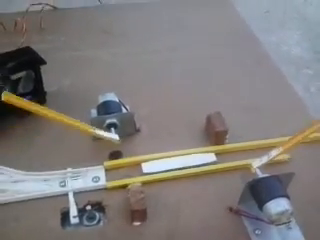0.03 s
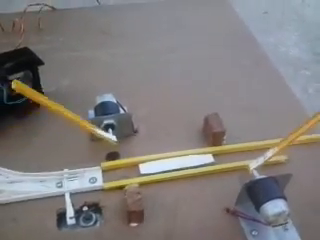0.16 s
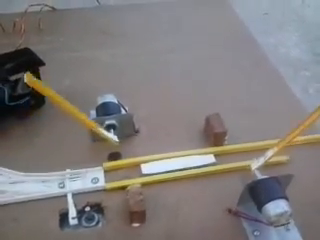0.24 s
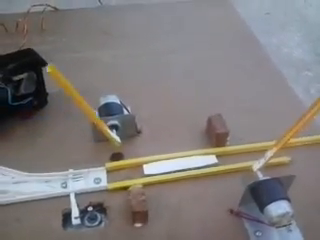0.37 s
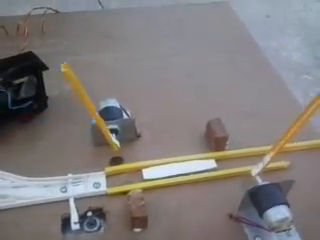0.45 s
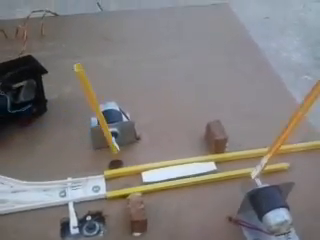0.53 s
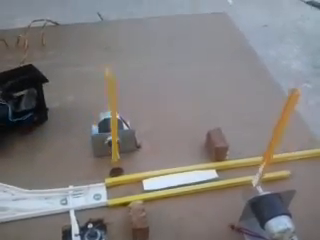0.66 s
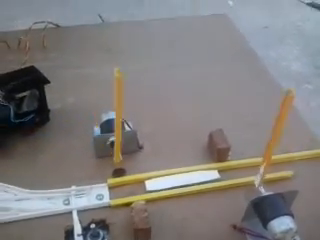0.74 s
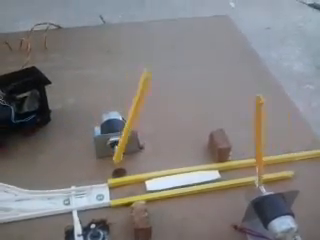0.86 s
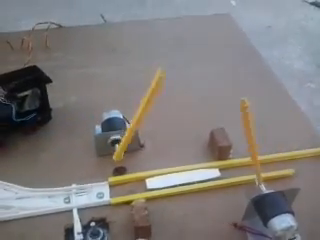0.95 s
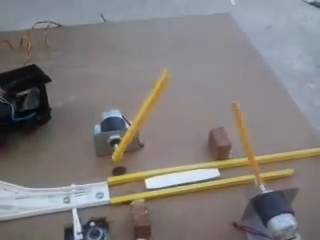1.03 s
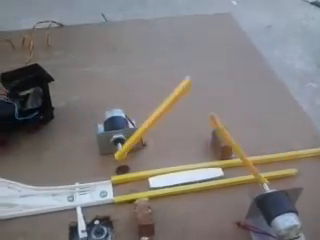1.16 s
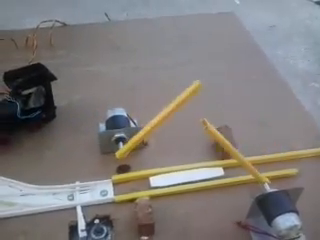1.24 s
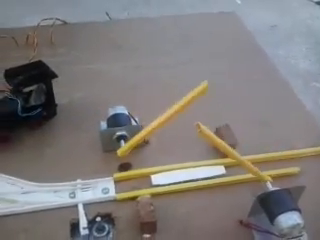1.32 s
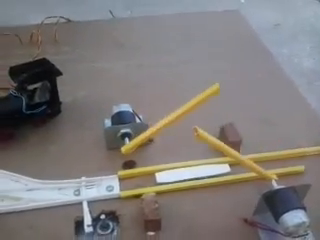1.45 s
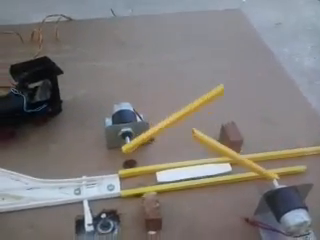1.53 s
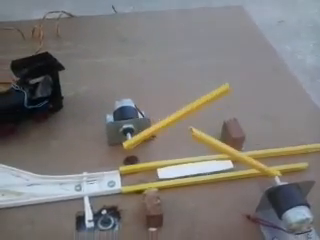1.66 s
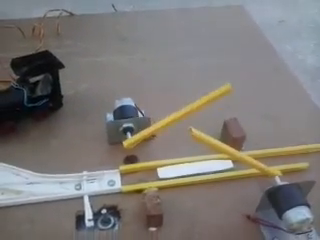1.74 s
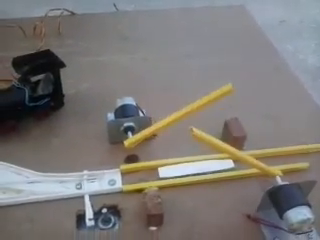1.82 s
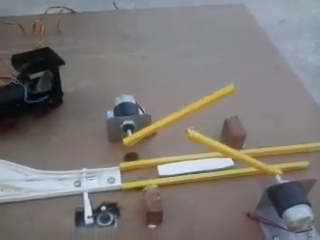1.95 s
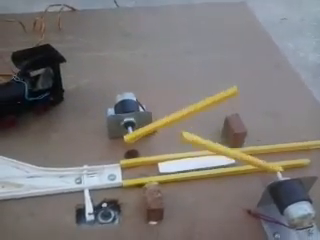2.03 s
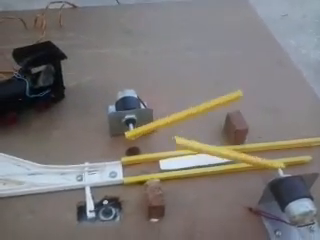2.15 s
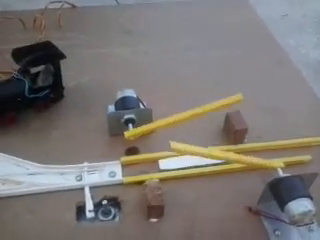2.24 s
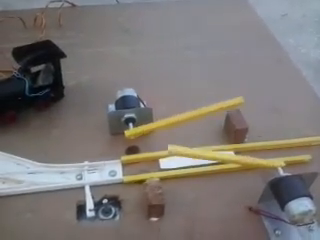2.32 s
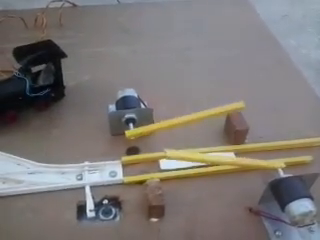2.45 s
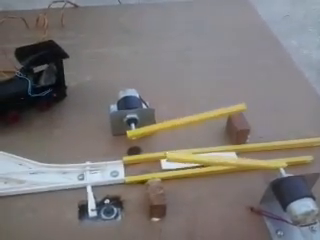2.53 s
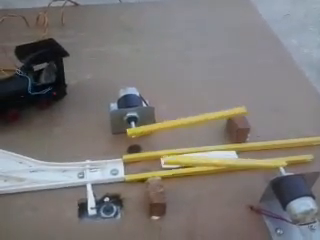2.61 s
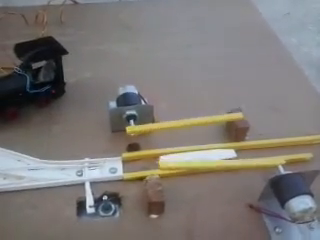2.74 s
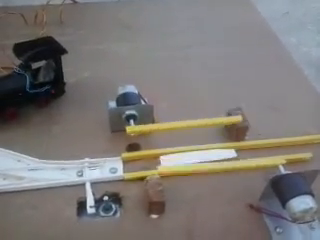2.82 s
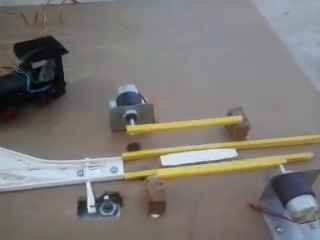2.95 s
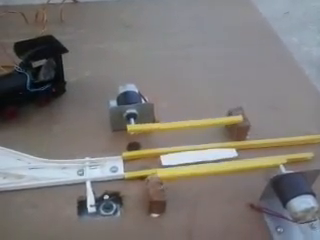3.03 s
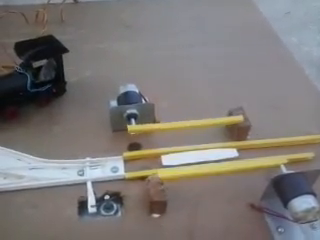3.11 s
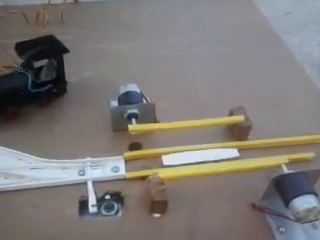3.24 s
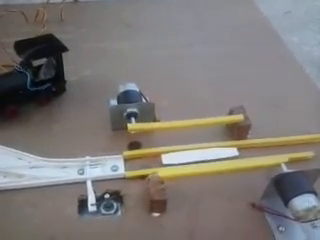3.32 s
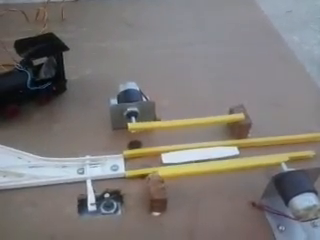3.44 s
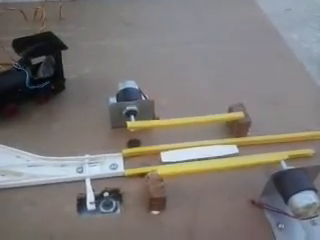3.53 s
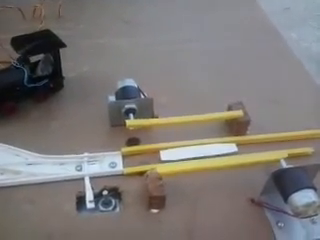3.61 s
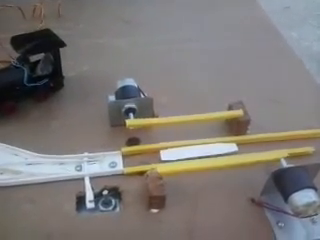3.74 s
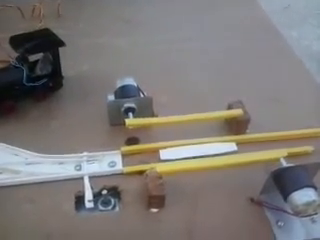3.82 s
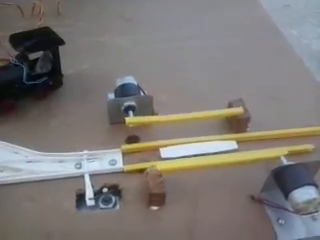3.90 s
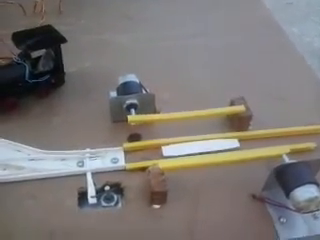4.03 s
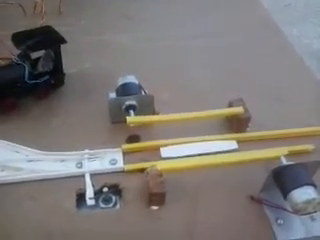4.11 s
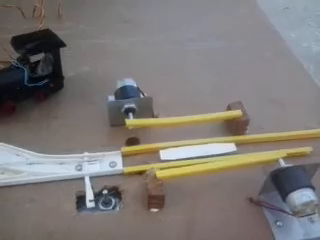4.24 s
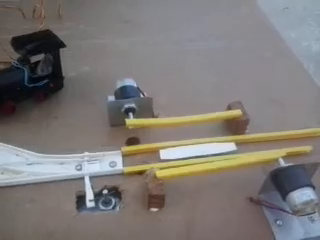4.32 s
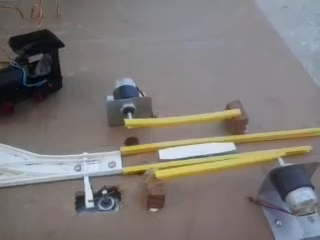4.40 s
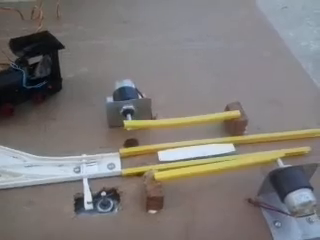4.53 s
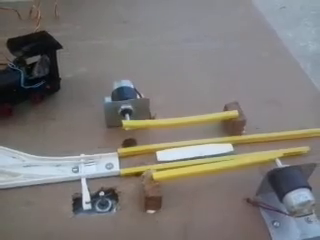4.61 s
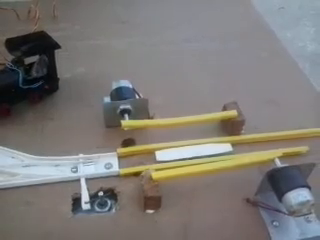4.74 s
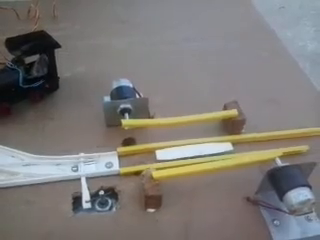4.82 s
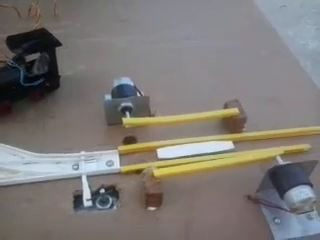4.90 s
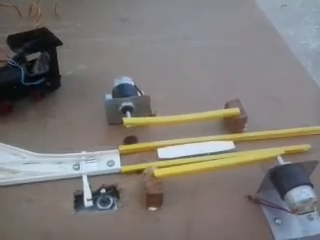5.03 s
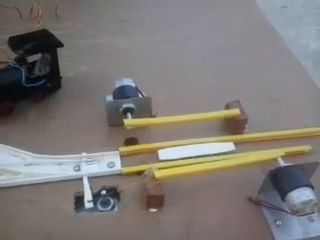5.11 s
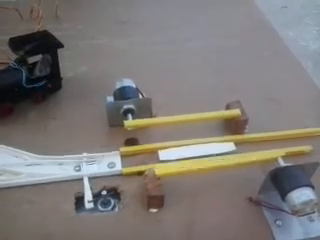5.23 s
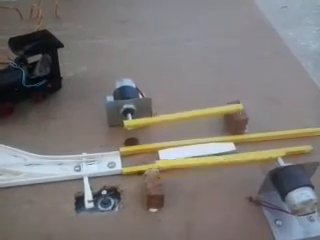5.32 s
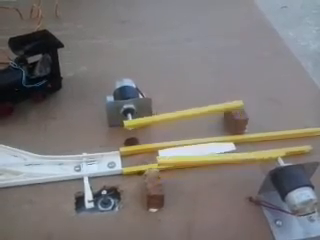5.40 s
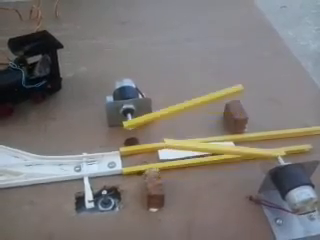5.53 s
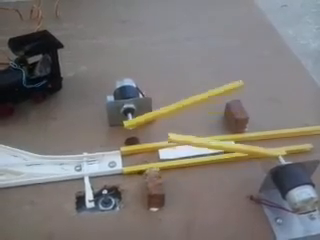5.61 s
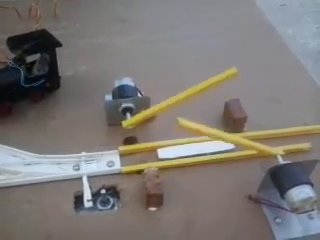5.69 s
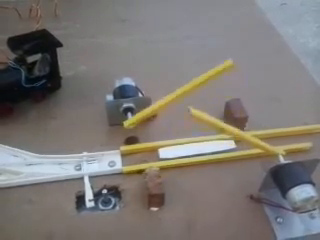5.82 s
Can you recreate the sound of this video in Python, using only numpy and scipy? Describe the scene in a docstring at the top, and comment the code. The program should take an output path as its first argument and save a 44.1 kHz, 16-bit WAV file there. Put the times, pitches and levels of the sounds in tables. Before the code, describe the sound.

Two tiny electric gear motors move barrier arms: gritty, metallic gear chatter with a fast flutter, falling in pitch as power cuts. Loose gears knock hard, brackets rattle, thin squeals fill pauses. Four bursts begin with a bright click. The near motor dominates until a final burst from the other. Quiet room noise behind; close, mono, limited treble.

```python
"""Two small gear motors swing barrier arms on a model railway board, indoors, in stop-start bursts of power.
Meshing teeth strike, scrape and chatter at the tooth rate; the rasp throbs once a wheel turn, then coasts down.
Resonant gearboxes, rattling brackets, a singing plate and a humming board radiate this force.
The near gearbox dominates at first, the far one in the last burst; switch snaps start four of the bursts.
Slack gears knock, thin squeals fill pauses, and steady room noise with faint low tones lies behind."""
import sys
import numpy as np
from scipy import signal
from scipy.fft import rfft, irfft, next_fast_len
from scipy.io import wavfile
from scipy.ndimage import uniform_filter1d, map_coordinates

SR = 44100
rng = np.random.default_rng(int(sys.argv[2]) if len(sys.argv) > 2 else 0)


def wav_out(sig):
    """Save sig, one row per channel (or a flat mono array), as 16-bit PCM at SR to the path in sys.argv[1]."""
    wavfile.write(sys.argv[1], SR, np.round(np.clip(np.atleast_2d(sig).T, -1, 1) * 32767).astype(np.int16))


N = 258426

# resonances of the near gearbox: centre_hz, width_hz, gain_db
NEAR_BOX_MODES = [(2468, 220, -11), (2970, 187, -4.5), (4050, 150, -12), (4660, 130, 0.5),
                  (5046, 155, -0.5), (5410, 216, -0.5), (5866, 220, -4.5), (6840, 437, -1.5)]
# near gear, teeth meeting per second: at the outset, and the limit under power
START_SPEED, FULL_SPEED = 886, 1000
CREEP_SPEED = 139  # teeth per second; well below it the gears barely sound


def amp(db):
    """Level to gain: twenty decibels are a factor of ten in amplitude."""
    return 10 ** (np.asarray(db) / 20)


def unit(x):
    """Normalisation: scale to an rms of 1."""
    return x / np.sqrt(np.mean(x ** 2) + 1e-20)


def curves(rows):
    """Linear interpolation in time: one value per sample for each column after the first."""
    times_s, *columns = np.transpose(rows)
    t = np.arange(N) / SR
    return [np.interp(t, times_s, column) for column in columns]


def filtered(x, response):
    """Convolution theorem: filtering multiplies the spectrum by a complex response of frequency."""
    size = 2 * next_fast_len(N // 2 + SR // 4)
    hz = np.fft.rfftfreq(size, 1 / SR)
    return irfft(rfft(x, size) * response(hz), size)[:N]


def coloured(x, points):
    """Minimum-phase filter: folding the cepstrum makes a causal response through (Hz, dB) points."""
    def response(hz):
        point_hz, point_db = np.transpose(points)
        gain_db = np.interp(np.log(hz + 1), np.log(point_hz), point_db)
        cepstrum = irfft(np.log(amp(gain_db)))
        half = len(cepstrum) // 2
        folded = np.r_[cepstrum[0], 2 * cepstrum[1:half]]
        return np.exp(rfft(folded, len(cepstrum)))
    return filtered(x, response)


def ringing(x, modes):
    """Modal superposition: a sum of damped resonances of alternating sign, each (Hz, width Hz, dB)."""
    def response(hz):
        total = 0
        for k, (centre, width, db) in enumerate(modes):
            damping = 1j * hz * width
            total = total + (-1) ** k * amp(db) * damping / (centre * centre - hz * hz + damping)
        return total
    return filtered(x, response)


def radiated(force, body):
    """Radiation through a body, scaled so that the power of white noise passes unchanged."""
    impulse = np.r_[1., np.zeros(N - 1)]
    return body(force) / np.linalg.norm(body(impulse))


def burst(decay):
    """Impact noise: a 40 ms scrap of energy 1 that dies exponentially, decay in seconds."""
    t = np.arange(SR // 25) / SR
    x = rng.standard_normal(len(t)) * np.exp(-t / decay)
    return x / np.linalg.norm(x)


def wobble(rate):
    """Band-limited randomness: a smooth curve through rate random knots a second; rate may vary."""
    place = np.cumsum(np.abs(rate) * np.ones(N)) / SR
    return map_coordinates(rng.standard_normal(N // 4), [place], mode="wrap")


def fuzzy(hz, width):
    """Narrow-band noise: random modulation, width knots a second, of a carrier in quadrature."""
    phase = 2 * np.pi * np.cumsum(hz * np.ones(N)) / SR
    return wobble(width) * np.cos(phase) + wobble(width) * np.sin(phase)


def swell(start, end, fade):
    """Linear envelope: fade in, hold, fade out, all in seconds."""
    t = np.arange(N) / SR
    return np.clip(np.minimum(t - start, end - t) / fade, 0, 1)


def room():
    """Stationary coloured noise: the steady sound of a quiet room."""
    # room spectrum, relative: frequency_hz, density_db
    spectrum = [(25, -14.5), (45, -18.5), (75, -25), (105, -36.5), (135, -21.5), (200, -17), (280, -13),
                (430, -8.5), (600, -11.5), (900, -11), (1350, -14.5), (1700, -16), (3500, -25.5),
                (5700, -26), (7400, -36), (9600, -84.5)]
    return amp(-48.5) * unit(coloured(rng.standard_normal(N), spectrum))


def low_tones():
    """Narrow-band noise: faint low tones that waver by random modulation."""
    # start_s, end_s, pitch_hz, level_db
    tones = [(3.8, 4.204, 546, -52), (5.329, 5.946, 465, -51), (5.452, 5.894, 830, -50.5)]
    sound = np.zeros(N)
    for start, end, hz, db in tones:
        sound = sound + amp(db) * swell(start, end, fade=.08) * fuzzy(hz, width=37)
    return sound


def squeals():
    """Gliding narrow-band noise: thin airy squeals, mostly between bursts."""
    # start_s, end_s, first_hz, last_hz, width (random knots per s), first_db, last_db
    glides = [(1.823, 1.972, 4750, 5250, 228.8, -42, -45), (4.472, 4.868, 5850, 5110, 850, -49, -57),
              (4.859, 5.13, 4890, 4670, 1498, -54.5, -50)]
    sound = np.zeros(N)
    for start, end, first_hz, last_hz, width, first_db, last_db in glides:
        hz, db = curves([(start, first_hz, first_db), (end, last_hz, last_db)])
        tone = 0.53 * fuzzy(hz, width) + 0.87 * fuzzy(hz, 0.91 * width)
        level = amp(db + 2.9 * wobble(30))
        sound = sound + level * swell(start, end, fade=0.039) * tone
    return sound


def background():
    """Superposition of the room noise, the low tones and the squeals."""
    return room() + low_tones() + squeals()


def snaps():
    """Impact and rebound: the switch contact strikes and bounces once."""
    # strike_s, level_db (before a common gain), bounce_delay_s, bounce_db (relative to the strike)
    strikes = [(1.942, -1, 0.0024, -6), (2.5905, -0.5, .0016, -8), (4.1759, -0.5, .0024, -7.5),
               (5.0971, -2.5, 0.0035, -3)]
    # relative spectrum of the switch: frequency_hz, gain_db
    switch_spectrum = [(100, -29.5), (300, -29), (1000, -27.5), (1600, -19.5), (2400, -22), (3200, -31),
                       (4200, -15), (4800, -2.5), (5600, -1.5), (6300, 2), (7000, -16), (8000, -22.5)]
    force = np.zeros(N + SR)
    for s, db, delay, bounce_db in strikes:
        for when, level_db in ((s, db), (s + delay, db + bounce_db)):
            hit = burst(decay=0.0009)
            force[round(when * SR):][:len(hit)] += amp(level_db + 12) * hit
    return radiated(force[:N], lambda x: coloured(x, switch_spectrum))


def knocks():
    """Impact excitation: slack wheels jump and knock in the near gearbox; harder ones chatter longer."""
    # knock_s, level_db (before a common gain)
    blows = [(0.286, -0.5), (0.4304, -1), (0.4604, 1), (0.8544, -13), (0.9109, 3), (1.891, -26.5),
             (2.2911, 0.5), (2.855, -2.5), (2.908, 1), (3.2385, -37), (3.2914, -33), (3.3485, -31),
             (4.567, -34), (4.743, -35.5), (5.1414, -25), (5.1703, -24), (5.213, -9.5)]
    tilt = [(800, -18), (2500, -5.5), (4500, 3.0)]  # Hz, dB
    force = np.zeros(N + SR)
    for s, db in blows:
        hit = burst(decay=np.interp(db, [-30, -5], [.0013, .006]))
        force[round(s * SR):][:len(hit)] += amp(db + 10.5) * hit
    return radiated(force[:N], lambda x: coloured(ringing(x, NEAR_BOX_MODES), tilt))


def drive():
    """Motor kinematics, in teeth per second: exponential approach to full speed, then even slowing."""
    # on_s, off_s, spin_up_s (time constant), slowing (teeth per second each second, once off)
    power_bursts = [(0, 1.088, 1.758, 1181), (1.942, 2.164, .207, 1096), (2.5906, 2.801, .246, 1490),
                    (4.1755, 4.322, .224, 2656), (5.0965, 5.131, .22, 30), (5.27, 5.56, .17, 300)]
    t = np.arange(N) / SR
    speed = np.full(N, float(START_SPEED))
    for on, off, spin_up, slowing in power_bursts:
        first = round(on * SR)
        powered = np.minimum(t[first:], off) - on
        coasting = np.maximum(t[first:] - off, 0)
        reached = FULL_SPEED + (speed[first] - FULL_SPEED) * np.exp(-powered / spin_up)
        speed[first:] = np.maximum(reached - slowing * coasting, 0)
    return speed


def loudness(speed):
    """Power law: faster teeth strike harder, and the gain dies away at a creep."""
    # about -16 dB at full speed, 11 dB more per tenfold speed
    power_law = amp(-16 + 11 * np.log10(speed / FULL_SPEED + 1e-6))
    return power_law * speed ** 2 / np.hypot(speed ** 2, CREEP_SPEED ** 2)


def throb(speed, depth_db, uneven_db):
    """Amplitude modulation: an off-centre wheel bears down once a turn, never quite alike."""
    turn_rate = speed / 26  # 26 teeth a turn
    turns = np.cumsum(turn_rate) / SR
    return unit(amp(depth_db * np.cos(2 * np.pi * turns) + uneven_db * wobble(turn_rate)))


def teeth(speed, scatter_db, scrape, chatter, decay, slack):
    """Mesh excitation of even power: each tooth strikes, then scrapes and chatters; decay, slack in s."""
    phase = np.cumsum(speed) / SR
    meet = np.flatnonzero(np.diff(np.floor(phase)))
    chance = rng.standard_normal((len(meet), 2))
    # slack shifts each blow in time, scatter varies its strength
    shift = np.round(slack * SR * chance[:, 0]).astype(int)
    at = np.clip(meet + shift, 0, N - 1)
    blows = np.bincount(at, amp(scatter_db * chance[:, 1]), N)
    # the scrape dies after each blow, the chatter follows the smoothed power
    keep = np.exp(-2 / (decay * SR))
    tails = np.sqrt(signal.lfilter([1 - keep], [1, -keep], blows ** 2))
    smoothed = uniform_filter1d(blows ** 2, SR // 25)
    power = np.abs(uniform_filter1d(smoothed, SR // 25))
    noise_level = scrape * tails + chatter * np.sqrt(power)
    force = blows + noise_level * rng.standard_normal(N)
    return force / np.sqrt(power * (1 + (scrape + chatter) ** 2) + 1e-4)


def gearboxes(near, far):
    """Forced resonance: each gear train rings its own box, and small boxes radiate little bass."""
    # resonances of the far gearbox: centre_hz, width_hz, gain_db
    far_box_modes = [(2277, 230, -12), (2870, 143, -5), (3475, 470, -10.5), (3980, 160, -8.5),
                     (4587, 237, -1.5), (5166, 320, -1.5), (5440, 277, 1.5), (6390, 1220, -8.5)]
    near_sound = amp(-0.5) * radiated(near, lambda x: ringing(x, NEAR_BOX_MODES))
    far_sound = amp(2.0) * radiated(far, lambda x: ringing(x, far_box_modes))
    return coloured(near_sound + far_sound, [(500, -12.5), (1200, 1.5), (2300, 0)])


def brackets(force, rattle_db, speed):
    """Structure-borne sound: the gear force rattles the brackets, relatively more at a creep."""
    # relative spectrum of the brackets: frequency_hz, gain_db
    bracket_spectrum = [(100, -39), (300, -19), (550, -8.5), (750, -14.5), (1080, -13), (1300, -3),
                        (1550, 0), (2100, -2), (3600, -10), (4500, -10)]
    creep_db = 7 * np.exp(-speed / CREEP_SPEED)
    shaken = force * amp(rattle_db + creep_db + 5.0)
    return radiated(shaken, lambda x: coloured(x, bracket_spectrum))


def whine(speed):
    """Harmonics through fixed resonances: overtones of the mesh glide past those of a plate."""
    # plate resonances: centre_hz, width_hz, gain_db
    plate_modes = [(2426, 174, 1), (2942, 256, 3)]
    phase = 2 * np.pi * np.cumsum(speed) / SR + 0.03 * wobble(120)
    overtones = np.zeros(N)
    for k in range(3, 9):
        overtones = overtones + np.sin(k * phase) * amp(2.5 * wobble(25))
    gain = np.interp(speed, [250, 446, 650, 900], [.05, 0.91, .9, 0.67])
    return ringing(overtones, plate_modes) * gain


def mesh_hum(speed, near_level):
    """Fundamental of the mesh: a wavering tone at the tooth rate glides through board resonances."""
    # board resonances: centre_hz, width_hz, gain_db
    board_modes = [(600, 60, -25), (936, 70, -30.5)]
    phase = 2 * np.pi * np.cumsum(speed) / SR + 0.7 * wobble(35)
    return ringing(near_level * amp(2.4 * wobble(22)) * np.sin(phase), board_modes)


def motors():
    """Gear noise: the mesh force of two trains, set by speed and strain, drives boxes, brackets and tones."""
    # time_s, strain_db (added to the level due to speed), rattle_db (of the brackets, before their gains)
    strain = [(0, 0.5, -23), (.7, 1.5, -23.5), (1.15, -.5, -23), (1.7, 0.5, -24), (1.78, -1, -18.5),
              (2.1, -.5, -22.5), (2.54, -1, -19.5), (2.92, -1, -21), (3.06, -0.5, -14.5), (3.2, -2, -20),
              (4.3, -1, -16.5), (5.2, -2.5, -12.5), (5.45, -5.5, -15), (5.86, -7, -13.5)]
    # time_s, far_share (of the power of the gear force, 0-1)
    far_share = [(0, 0.21), (1.3, 0.13), (1.7, 0.1), (2.9, 0.19), (4.3, 0.34), (5.12, 0.52), (5.4, 0.93),
                 (5.86, 0.94)]
    # time_s, singing_db (gain of the near gear's whine)
    singing_gain = [(0, -10.5), (1.5, -12), (2.1, -9.5), (2.9, -9), (4.3, -10.5)]
    speed = drive()
    far_speed = speed * 1.3
    strain_db, rattle_db = curves(strain)
    level = amp(strain_db) * loudness(speed)
    share = np.clip(curves(far_share)[0], 0, 1)

    depth_db = np.interp(speed, [300, 600, 900], [3.3, 2.9, 2.0])
    load = throb(speed, depth_db, uneven_db=.5)
    near_level = level * np.sqrt(1 - share) * load
    near = near_level * teeth(speed, scatter_db=0.0, scrape=1.78, chatter=0.22, decay=0.0016, slack=.00004)
    far_level = level * np.sqrt(share) * throb(far_speed, depth_db=0.43, uneven_db=1.0)
    far = far_level * teeth(far_speed, scatter_db=2.0, scrape=1.4, chatter=1.0, decay=0.0012, slack=.0003)

    # the teeth sing where the wheel presses hardest: load counts twice
    singing = amp(curves(singing_gain)[0]) * near_level * load * whine(speed)
    rasp = gearboxes(near, far) + brackets(near + far, rattle_db, speed)
    return rasp + singing + mesh_hum(speed, near_level)


def scene():
    """Superposition: the sounds of board and room add in one channel."""
    return (background() + snaps() + knocks() + motors())[None]


def record(dry):
    """Band limiting and clipping: a microphone dulls the treble, peaks clip, and a low-pass cuts the top."""
    # microphone response: frequency_hz, gain_db
    microphone = [(7000, 0), (7250, -9.5), (7500, -23), (7800, -41.5), (8300, -37.5), (8950, -20.5),
                  (9400, -45.5), (11000, -70.5)]
    x = coloured(dry[0], microphone)
    ceiling, top_hz = .68, 15850
    return filtered(np.clip(x, -ceiling, ceiling), lambda hz: hz < top_hz)[None]


dry = scene()
out = record(dry)
wav_out(out)
```